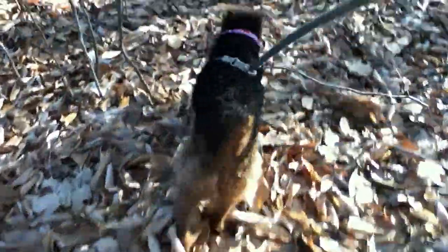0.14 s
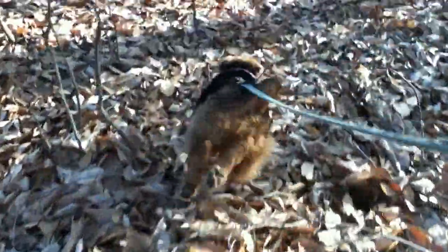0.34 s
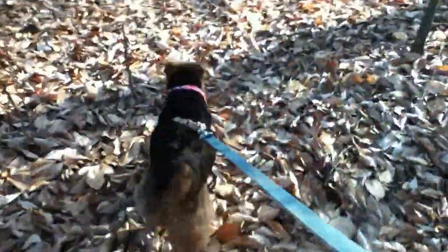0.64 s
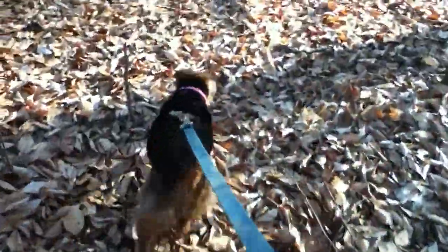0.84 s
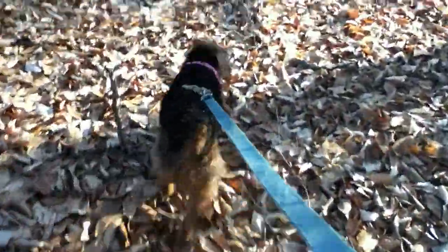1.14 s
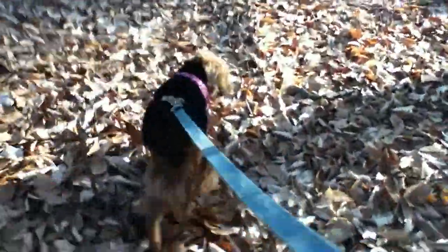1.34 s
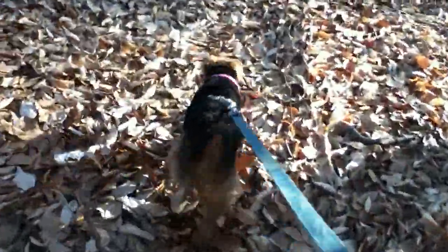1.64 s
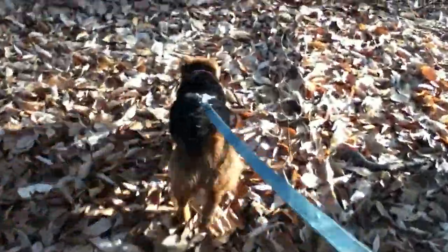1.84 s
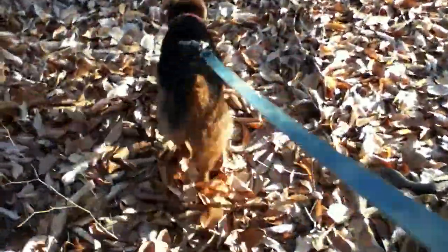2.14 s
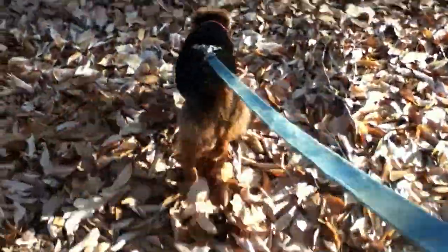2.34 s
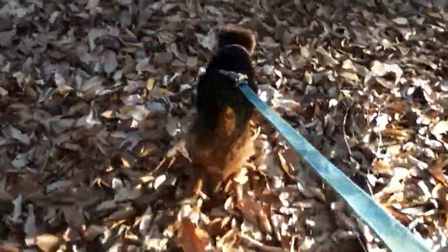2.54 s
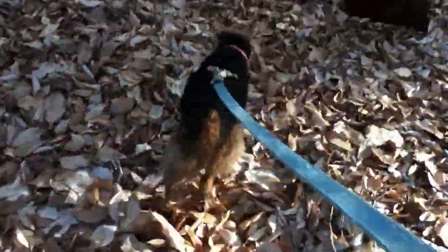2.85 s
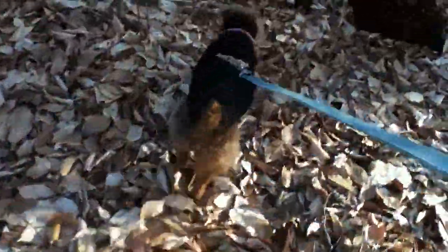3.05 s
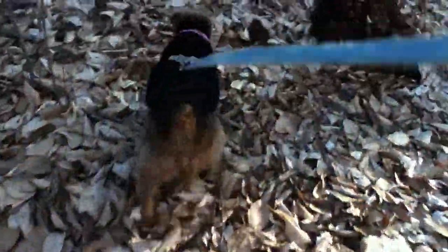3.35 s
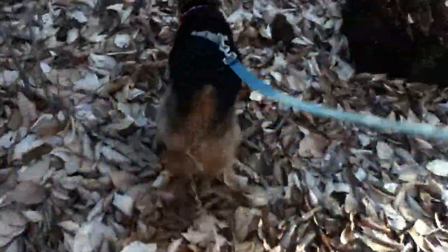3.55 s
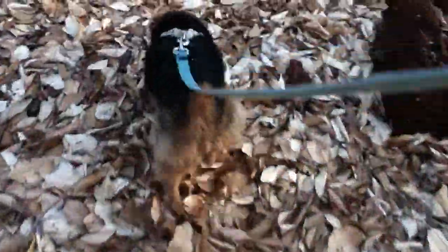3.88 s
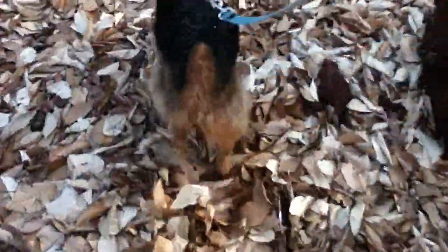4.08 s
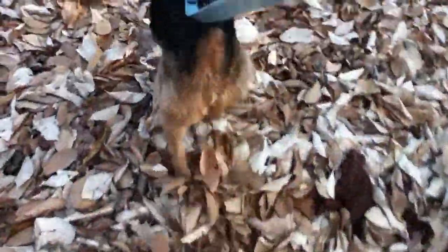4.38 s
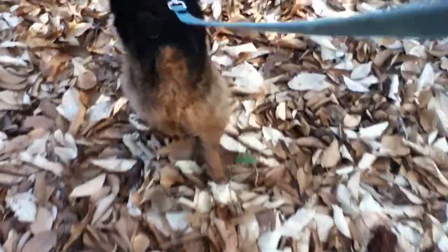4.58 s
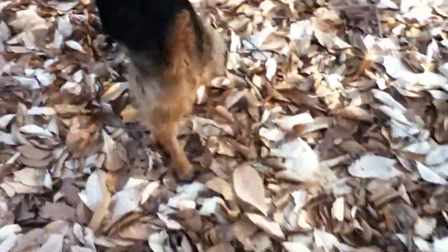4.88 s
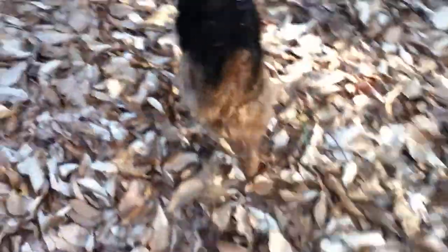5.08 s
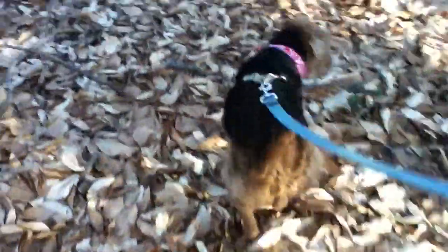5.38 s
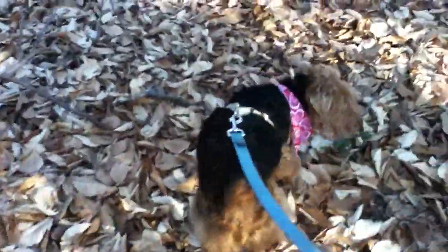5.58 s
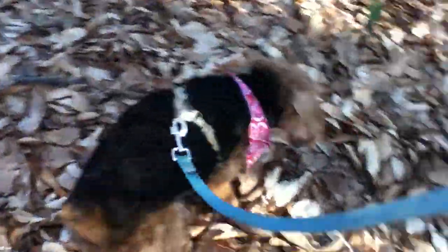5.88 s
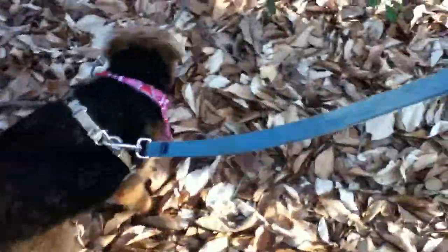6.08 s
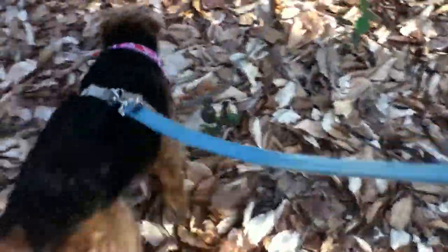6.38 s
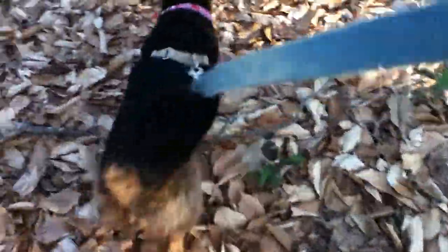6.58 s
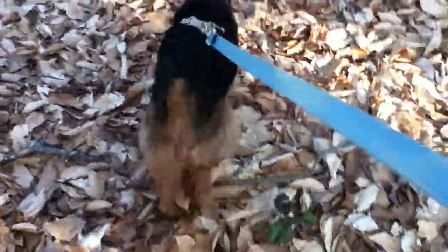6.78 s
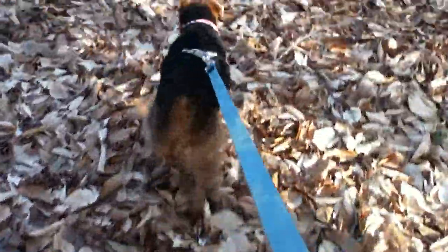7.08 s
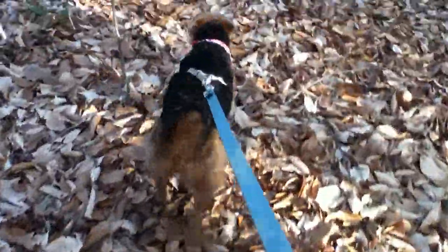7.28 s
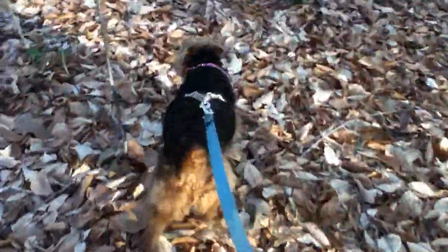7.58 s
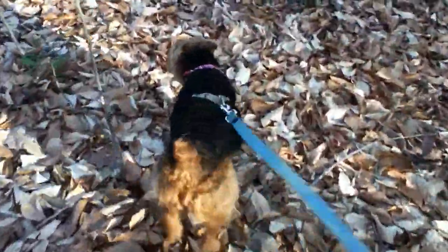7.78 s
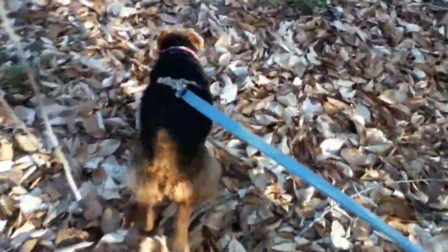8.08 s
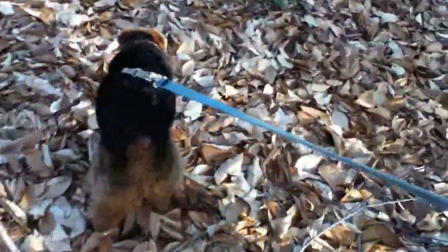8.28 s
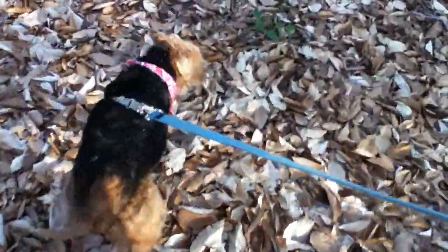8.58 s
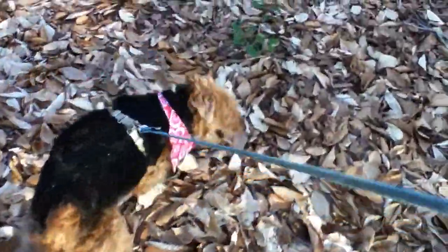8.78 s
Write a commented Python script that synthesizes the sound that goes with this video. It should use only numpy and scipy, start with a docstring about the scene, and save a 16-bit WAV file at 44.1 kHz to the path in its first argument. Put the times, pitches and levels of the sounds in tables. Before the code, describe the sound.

Close, bright crunching of dry leaves as a walker follows a small leashed dog through woods. Steps come about every half to one second, each swelling and easing, with lighter paw scuffs between. Twigs snap early on, then steps grow fuller in the middle and continue to the end. Quiet outdoor air and a very faint low hum lie behind. The microphone is carried close above the ground, dry and without echo.

```python
"""Outdoors, a walker follows a small dog on a lead over a thick bed of dry fallen leaves.
Every tread breaks many leaf ribs and blades: random impulses excite damped resonances in a dense crackle.
Noise adds the fine rustle; slower, lower resonances and dull noise give the pressed layers and soft litter.
Twigs snap, paws crush leaves and hollow sticks knock as decaying noise bursts with a pitch of their own.
Heels thud as damped sines, and a low wavering hum lies far off. Both channels carry the same sound."""
import sys
import numpy as np
from scipy import signal
from scipy.fft import rfft, irfft
from scipy.io import wavfile
from scipy.ndimage import uniform_filter1d

SR = 44100
rng = np.random.default_rng(int(sys.argv[2]) if len(sys.argv) > 2 else 0)


def transcribe(u):
    """Save the signal u as a 16-bit wav file named by the first command-line argument.

    u: samples, shape (n,) or (channels, n), limited to [-1, 1]; the rate is SR.
    q: integer samples, one column per channel.
    """
    v = np.clip(np.atleast_2d(u).T, -1, 1)
    q = np.round(v * 32767).astype(np.int16)
    wavfile.write(sys.argv[1], SR, q)


N = 393813

# Filter spectrum of brittle surface leaves. Each row: frequency in Hz, relative level in dB.
LEAF_SPECTRUM = [(400, -36), (900, -11.5), (1470, -9), (1950, 0.5), (2650, -0.5), (3250, 1), (3900, 0),
                 (5000, 0), (8500, -2.5), (11000, -6), (13000, -9.5), (15600, -19)]
# Filter spectrum of snapping and collapsing stalks. Each row: frequency in Hz, relative level in dB.
SNAP_SPECTRUM = [(60, -28), (250, -11.5), (1000, -8), (3500, -8), (8000, -8), (12000, -9.5), (15500, -18)]


def from_db(db):
    """The decibel is logarithmic: 20 dB is a tenfold amplitude."""
    return 10 ** (np.asarray(db) / 20)


def rms_one(x):
    """Normalise by the root of the mean power, to an rms of 1."""
    return x / np.sqrt(np.mean(x ** 2) + 1e-20)


def in_time(rows):
    """Linear interpolation of (seconds, value) rows at every sample."""
    seconds, value = np.transpose(rows)
    return np.interp(np.arange(N) / SR, seconds, value)


def add(track, start_s, sound):
    """Superposition: pressures sum where sounds overlap."""
    at = int(np.clip(round(start_s * SR), 0, N - 1))
    track[at:at + len(sound)] += sound[:N - at]


def coloured(x, points, size=4096):
    """Minimum-phase filtering: a folded cepstrum turns the magnitude spectrum into a causal response."""
    hz, db = np.transpose(points)
    grid = np.maximum(np.fft.rfftfreq(size, 1 / SR), 1)
    magnitude = from_db(np.interp(np.log(grid), np.log(hz), db))
    cepstrum = irfft(np.log(magnitude))
    # fold negative times onto positive ones
    cepstrum[1:size // 2] *= 2
    cepstrum[size // 2 + 1:] = 0
    response = irfft(np.exp(rfft(cepstrum)))
    return signal.oaconvolve(x, response)[:len(x)]


def resonance(x, hz, width_hz):
    """Damped oscillator: a two-pole resonance whose bandwidth sets its damping, with unit gain on top."""
    radius = np.exp(-np.pi * width_hz / SR)
    angle = 2 * np.pi * min(hz, SR / 2 - 1) / SR
    zeros = np.array([1, 0, -1]) * (1 - radius * radius) / 2
    poles = [1, -2 * radius * np.cos(angle), radius * radius]
    return signal.lfilter(zeros, poles, x)


def drift(per_s):
    """Slow random modulation: interpolated Gaussian values, per_s a second, with an rms of 1."""
    steps = np.arange(N) * min(per_s, SR / 2) / SR
    return rms_one(np.interp(steps, np.arange(N), rng.standard_normal(N)))


def dying(t60, size):
    """Exponential decay: energy loss takes the amplitude down 60 dB in t60 seconds."""
    return from_db(-60 * np.arange(size) / SR / max(t60, 1e-4))


def steadied(x, window_s):
    """Envelope normalisation: dividing by a moving rms evens the slow level and leaves the fast grain."""
    power = uniform_filter1d(x ** 2, max(int(window_s * SR), 2))
    return x / np.sqrt(np.abs(power) + 1e-9)


def starting_at(sound, level_db, size):
    """Onset scaling: the first size samples take the given rms level."""
    return from_db(level_db) * sound / np.sqrt(np.mean(sound[:size] ** 2))


def crack(hz, t60, sharpness, ring_db, shiver_db, shiver_t60, size=2048):
    """Impulsive fracture: a burst rings in its own blade, and the leaves that touch it shiver."""
    burst, shiver = rng.standard_normal((2, size))
    burst = burst * dying(t60, size)
    ring = resonance(burst, hz, hz / sharpness)
    shiver = shiver * dying(shiver_t60, size)
    return rms_one(rms_one(burst) + from_db(ring_db) * rms_one(ring) + from_db(shiver_db) * rms_one(shiver))


def fractures(per_s, spread_db, largest_db):
    """Random point process: breaks at chance moments, many tiny and a few large."""
    sizes = from_db(np.minimum(spread_db * rng.exponential(1, N), largest_db))
    happens = rng.random(N) < per_s / SR
    return happens * sizes * rng.choice([-1, 1], N)


def press(start_s, hold_s, rise_s, fall_s):
    """Loading envelope: one tread rises, holds and falls, in dB below its top."""
    fade_db = 20.5  # rise and fall times span this many dB
    t = np.arange(N) / SR
    before = np.maximum(start_s - t, 0) / max(rise_s, .005)
    after = np.maximum(t - start_s - hold_s, 0) / max(fade_floor(fall_s), .005)
    return -fade_db * np.minimum(before + after, 5)


def fade_floor(fall_s):
    """Unloading time: the shortest fall allowed is 5 ms."""
    return max(fall_s, .005)


def footwork():
    """Incoherent treads add in power; gives dB levels of crunch, treble lift, packed layers and litter."""
    # The walker's steps, rolling from heel to toe. Each row: heel landing in seconds, roll in seconds,
    # rise in seconds, fall in seconds, heel crunch in dB, toe crunch in dB, packed layers against the
    # crunch under the heel in dB, the same under the toe in dB, treble lift in dB,
    # soft litter against the packed layers in dB.
    steps = [(0.0, 0.17, .2, 0.2, -13.5, -22, -13, -6, 0.5, -5),
             (0.685, 0.03, .22, 0.25, -20, -21, -10, -10, 1, -9),
             (1.392, .08, 0.12, .26, -17, -17.5, -9, -10.5, 2, -6.5),
             (1.958, 0.22, 0.12, .19, -14, -15.5, -15.5, -11.5, 1.5, -6),
             (2.84, 0.058, 0.15, .08, -11, -14.5, -12, -9.5, 0.5, -9.5),
             (3.341, 0.14, 0.087, 0.27, -13.5, -13.5, -12.5, -10.5, 0.5, -5),
             (3.932, 0.15, 0.12, .24, -11.5, -12.5, -11, -10.5, 1.5, -14),
             (4.575, 0.21, .1, .36, -15.5, -13, -12.5, -11.5, 1.8, -9),
             (5.525, .025, .28, 0.16, -14.5, -14.5, -9.5, -9, 2.3, -11),
             (5.965, .03, 0.24, 0.21, -13, -13, -13, -10, 2.5, -23),
             (6.51, .155, 0.14, 0.47, -15, -15.5, -12, -15.5, 1.4, -11),
             (7.664, .03, 0.21, 0.18, -15, -14.8, -9.5, -8, 1.5, -10),
             (8.325, 0.14, .16, 0.35, -13.5, -19.5, -12, -8.5, 2, -19)]
    # Light treads, the dog's paws and scuffs through the top leaves. Each row: start in seconds,
    # length in seconds, crunch in dB, packed layers against the crunch in dB, treble lift in dB.
    pats = [(0.264, 0.0054, -26, -18, 1), (0.337, 0.085, -19.5, -11, -0.5), (0.593, 0.027, -30.5, -24, 8),
            (0.833, 0.13, -26, -15.5, 1.5), (1.094, 0.093, -23, -19, 2.5), (1.284, .03, -22, -28, 0.5),
            (1.581, 0.069, -25, -14, 1.5), (1.875, .04, -26.5, -4.5, 0), (2.319, 0.055, -16, -17.5, 2.5),
            (2.477, 0.082, -22, -12.5, 1), (2.632, 0.11, -19, -14.5, -.5), (2.939, .065, -18.5, -13.5, 1.5),
            (3.07, .035, -21.3, -11.5, 3), (3.235, .04, -22.5, -13.5, -1), (3.61, 0.021, -21.5, -17, 1),
            (3.78, 0.0099, -16, -13.5, 0), (4.23, .02, -21, -16, -0.5), (4.317, 0.018, -23.5, -15, 1),
            (4.41, .1, -25.5, -18, 2.5), (5.062, 0.081, -20.5, -16.5, 3), (5.301, .13, -21, -17, 0.5),
            (5.682, 0.021, -22, -10.5, -2), (5.783, 0.071, -20.5, -20, 2.5), (6.28, .03, -26, -10.5, 2),
            (6.385, 0.04, -23, -12, 3), (6.781, .04, -23.5, -11.5, -8), (7.065, 0.014, -19.5, -13, 1.5),
            (7.196, .04, -23.5, -10.5, 2), (7.289, .025, -21.5, -12.5, 1), (7.427, 0.028, -30.5, -16, -1),
            (7.893, 0.16, -30, -12, -2), (8.063, 0.047, -23.5, -11, 0), (8.586, .03, -23.5, -13, -4),
            (8.724, .05, -21.5, -15.5, 0), (8.88, .05, -21, -14, 2.5)]
    # Depth of the soft litter along the trail. Each row: time in seconds,
    # litter level against the packed layers under light treads in dB.
    depth = [(0.0, -3), (1.05, -14.5), (1.8, -11), (2.45, -2), (2.8, -8), (4.4, -1), (4.9, -11), (5.2, 3),
             (5.75, 1), (6.1, -14), (6.8, -3.5), (8.1, -7.5), (8.65, -2), (8.93, -10)]
    pat_rise_s, pat_fall_s = .08, .12
    stir_db, stir_packed_db = -33, -40.5  # leaves keep stirring between the treads
    midfoot_sag_db_per_s = 13.5  # the longer the roll, the more the crunch eases between heel and toe
    t = np.arange(N) / SR
    crunch = np.full(N, from_db(stir_db) ** 2)
    treble = crunch.copy()
    packed = np.full(N, from_db(stir_packed_db) ** 2)
    for start_s, length_s, level_db, weight_db, lift_db in pats:
        power = from_db(level_db + press(start_s, length_s, pat_rise_s, pat_fall_s)) ** 2
        crunch += power
        treble += power * from_db(lift_db) ** 2
        packed += power * from_db(weight_db) ** 2
    litter = packed * from_db(in_time(depth)) ** 2
    for (start_s, roll_s, rise_s, fall_s, heel_db, toe_db,
         heel_weight_db, toe_weight_db, lift_db, sink_db) in steps:
        midfoot_db = (heel_db + toe_db) / 2 - midfoot_sag_db_per_s * roll_s
        roll_times = [start_s, start_s + roll_s / 2, start_s + roll_s]
        rolling_db = np.interp(t, roll_times, [heel_db, midfoot_db, toe_db])
        power = from_db(rolling_db + press(start_s, roll_s, rise_s, fall_s)) ** 2
        weight_db = np.interp(t, [start_s, start_s + roll_s], [heel_weight_db, toe_weight_db])
        weight = power * from_db(weight_db) ** 2
        crunch += power
        treble += power * from_db(lift_db) ** 2
        packed += weight
        litter += weight * from_db(sink_db) ** 2
    return 10 * np.log10([crunch, treble / crunch, packed, litter])


def leaf_bed(breaks, leaves, hold_s, count):
    """Convolution of breaks with leaf responses: count leaves at a time crack repeatedly for hold_s."""
    slot = rng.integers(0, count, N)
    turn = (np.arange(N) / SR / max(hold_s, .001) + slot / count).astype(int)
    dealt = rng.integers(0, len(leaves), N)[turn * count + slot]
    out = sum(signal.oaconvolve(breaks * (dealt == k), leaf)[:N] for k, leaf in enumerate(leaves))
    # the inverse of the leaves' mean power spectrum makes the whole bed evenly coloured
    power = np.mean(np.abs(rfft(leaves)) ** 2, axis=0)
    grid = np.fft.rfftfreq(len(leaves[0]), 1 / SR)
    inverse = np.column_stack([grid, -10 * np.log10(power)])[1:]
    return rms_one(coloured(out, inverse))


def top_leaves(breaks, tread_db, lift_db, count=48):
    """Brittle fracture and friction: surface leaves crackle over the rustle of sliding blades."""
    leaves = [crack(hz, t60=0.0039, sharpness=3.4, ring_db=-6.5, shiver_db=4.5, shiver_t60=0.1)
              for hz in np.geomspace(1500, 11000, count)]
    crackle = leaf_bed(breaks, leaves, hold_s=.025, count=3)
    rustle = from_db(-6) * rng.standard_normal(N)
    sound = steadied(coloured(crackle + rustle, LEAF_SPECTRUM), window_s=0.05)
    high_pass = signal.butter(1, 6500, "high", fs=SR, output="sos")
    treble = signal.sosfilt(high_pass, sound)
    lift = from_db(lift_db)
    # the treble rises by the lift and the rest drops by as much
    tilted = (sound - treble) / lift + treble * lift
    return tilted * from_db(tread_db - 3.5)


def packed_leaves(breaks, packed_db, litter_db, count=24):
    """Damping under load: the same breaks sound duller and longer below, dullest in the soft litter."""
    # Filter spectrum of the pressed layers. Each row: frequency in Hz, relative level in dB.
    packed_spectrum = [(120, -23.5), (300, -12), (430, -3.5), (560, -4), (800, -1.5), (1250, -2),
                       (1800, -1.5), (3000, -27)]
    # Filter spectrum of the soft litter. Each row: frequency in Hz, relative level in dB.
    litter_spectrum = [(25, -35), (60, -19.5), (130, -8), (250, -4), (380, -1), (600, -12), (1200, -18.5)]
    leaves = [crack(hz, t60=0.0095, sharpness=3.1, ring_db=-6.0, shiver_db=-2, shiver_t60=0.034)
              for hz in np.geomspace(300, 1700, count)]
    crunch = leaf_bed(breaks, leaves, hold_s=.02, count=4)
    crunch = crunch + from_db(-6) * rng.standard_normal(N)
    packed = steadied(rms_one(coloured(crunch, packed_spectrum)), window_s=0.26)
    litter = steadied(rms_one(coloured(crunch, litter_spectrum)), window_s=0.064)
    return from_db(packed_db - 4.5) * packed + from_db(litter_db - 7.0) * litter


def settling(tread_db, count=16):
    """Elastic recovery: bent leaves spring back one by one in lone bright ticks."""
    ticks = fractures(per_s=42, spread_db=5.0, largest_db=9)
    dealt = rng.integers(0, count, N)
    out = np.zeros(N)
    for k, hz in enumerate(np.geomspace(3500, 12000, count)):
        tick = crack(hz, t60=.0018, sharpness=3.0, ring_db=0, shiver_db=-9, shiver_t60=.02)
        tick = starting_at(coloured(tick, LEAF_SPECTRUM), 0, size=88)
        out += signal.oaconvolve(ticks * (dealt == k), tick)[:N]
    return out * from_db(.7 * tread_db - 16)


def distance():
    """Frequency and amplitude modulation make a far-off hum waver over low-pitched air noise."""
    # Distant hum. Each row: time in seconds, level in dB before the 2 dB cut and the random wavering.
    hum_level = [(0, -73), (3.4, -58), (4.7, -56), (5.2, -64), (6.25, -54), (6.8, -58), (7.9, -57),
                 (7.99, -49), (8.35, -48), (8.48, -57), (8.93, -65)]
    # Filter spectrum of the outdoor air. Each row: frequency in Hz, relative level in dB.
    air_spectrum = [(20, -35), (60, -2), (100, -3.5), (250, -2), (1000, -7.5), (8000, -43)]
    hum_hz, air_db = 97, -51.5  # centre of the wavering pitch; rms level of the air
    phase = 2 * np.pi * np.cumsum(hum_hz + 2.3 * drift(12)) / SR
    hum = np.sin(phase) * from_db(in_time(hum_level) - 2.0 + 2.9 * drift(14))
    air = rms_one(coloured(rng.standard_normal(N), air_spectrum))
    return hum + from_db(air_db) * air


def collapses(rows, sharpness, ring_db, grain_db, size=8192):
    """Cavity resonance: a dying rush of small breaks rings at the pitch of the hollow that caves in."""
    out = np.zeros(N)
    for start_s, level_db, t60, hz in rows:
        grain_sizes = from_db(grain_db * rng.standard_normal(size))
        grains = rng.standard_normal(size) * grain_sizes * dying(t60, size)
        ring = rms_one(resonance(grains, hz, hz / sharpness))
        sound = coloured(rms_one(grains) + from_db(ring_db) * ring, SNAP_SPECTRUM)
        add(out, start_s, starting_at(sound, level_db - 0.5, size=256))
    return out


def hollow_knocks():
    """Strong resonance: sticks and husks under the leaves knock with a clear pitch."""
    # Each row: start in seconds, starting level in dB before a 0.5 dB cut, t60 in seconds, pitch in Hz.
    knocks = [(0.149, -22.5, 0.089, 1400), (0.522, -21, 0.026, 1300), (0.5368, -20, 0.0076, 900),
              (1.09, -34, 0.1, 600), (1.832, -33, .04, 1500), (1.9125, -24.5, .04, 676),
              (3.447, -24, 0.036, 350), (4.725, -30, 0.14, 1030), (4.799, -36, 0.086, 1150),
              (4.845, -26.5, 0.2, 820), (4.877, -23, 0.063, 830), (5.063, -29, .06, 930),
              (5.699, -33, 0.042, 900), (6.374, -33, .06, 775), (6.525, -24.5, 0.051, 1110),
              (7.188, -28, 0.072, 774), (7.964, -30, 0.055, 795), (8.139, -32, 0.03, 1000),
              (8.622, -27, .05, 520)]
    return collapses(knocks, sharpness=1.65, ring_db=9, grain_db=-1.0)


def crushed_leaves():
    """Weak resonance: single curled leaves collapse under a paw with more rush than ring."""
    # Each row: start in seconds, starting level in dB before a 0.5 dB cut, t60 in seconds, centre in Hz.
    crushes = [(0.348, -22.5, 0.26, 8000), (0.4925, -21.5, 0.31, 3500), (0.692, -20.5, 0.12, 2500),
               (1.957, -20, 0.086, 2400), (2.835, -28, .08, 5000), (3.2005, -24, .06, 2000),
               (3.2085, -17.5, 0.072, 6000), (3.221, -20, 0.059, 7500), (3.361, -14.5, 0.11, 4940),
               (3.7255, -19, 0.062, 7000), (3.766, -23, .10, 3500), (4.151, -17, 0.069, 8500),
               (4.240, -17.5, 0.16, 3380), (4.533, -21, 0.12, 4000), (5.525, -15, 0.091, 4500),
               (5.762, -22.5, 0.061, 5000), (5.970, -12.5, 0.14, 6000), (6.374, -23, 0.076, 4000),
               (6.798, -20.5, 0.12, 5970), (6.982, -17, 0.17, 4200), (7.553, -27, 0.18, 6000),
               (8.606, -21.5, 0.05, 5000)]
    return collapses(crushes, sharpness=1.6, ring_db=-3.0, grain_db=0.0)


def twigs():
    """Sudden release of strain: a stalk breaks with a sharp crack and a short woody ring."""
    # Each row: start in seconds, level of the first 2 ms in dB,
    # nominal t60 in seconds (halved for the burst, doubled for the shiver), centre in Hz.
    snaps = [(0.506, -15, .014, 8400), (0.5217, -10, .014, 2400), (0.5366, -11, .012, 3400),
             (0.6023, -20, .012, 9500), (0.7112, -19, .012, 3400), (1.8344, -25, .012, 2000),
             (2.778, -16, .012, 9000), (2.9035, -17, .012, 4800), (3.003, -18, .014, 5800),
             (3.136, -18, .014, 5000), (3.170, -20, .014, 5400), (3.6713, -15, .012, 7000),
             (4.0868, -10, .008, 3000), (4.7313, -14, .012, 7100), (5.0635, -22.5, .014, 7500),
             (5.229, -25, .012, 5900), (5.6765, -21, .012, 7400), (6.3379, -18, .014, 3700),
             (6.9807, -12.5, .018, 4200), (7.0397, -23, .005, 5200), (7.2758, -22, .012, 2000),
             (7.522, -25, .012, 6500), (7.622, -19, .012, 6500), (7.7815, -21, .012, 6000),
             (8.0468, -24, .012, 6000), (8.095, -22, .012, 7400), (8.146, -23, .012, 6000),
             (8.2355, -18, .022, 3400), (8.5854, -21, .014, 7300)]
    out = np.zeros(N)
    for start_s, level_db, t60, hz in snaps:
        sound = crack(hz, t60 / 2, sharpness=1.4, ring_db=1.5, shiver_db=-4, shiver_t60=t60 * 2)
        add(out, start_s, starting_at(coloured(sound, SNAP_SPECTRUM), level_db, size=88))
    return out


def soil(size=8192):
    """Damped oscillation: soft ground gives a few cycles under a heel or a tug."""
    # Each row: start in seconds, nominal level in dB before a 4 dB cut and the swell, pitch in Hz.
    thuds = [(0.536, -39, 178), (2.859, -26, 151), (3.469, -39, 215), (6.589, -38, 78.1)]
    out = np.zeros(N)
    t = np.arange(size) / SR
    swell = dying(0.13, size) * (1 - dying(0.022, size))
    for start_s, level_db, hz in thuds:
        add(out, start_s, from_db(level_db - 4.0) * swell * np.sin(2 * np.pi * hz * t))
    return out


def scene():
    """Fracture rate follows load: harder treading breaks more leaves a second, in clumps."""
    tread_db, lift_db, packed_db, litter_db = footwork()
    clumps_db = 3.6 * drift(160)
    per_s = 1900 * from_db(.7 * (tread_db - tread_db.mean()) + clumps_db)
    breaks = fractures(per_s, spread_db=3.0, largest_db=8)
    leaves = top_leaves(breaks, tread_db, lift_db)
    leaves = leaves + packed_leaves(breaks, packed_db, litter_db) + settling(tread_db)
    mix = leaves + distance() + hollow_knocks() + crushed_leaves() + twigs() + soil()
    return np.tile(mix, (2, 1))


def record(dry):
    """Saturation and band limiting: the tallest peaks are rounded off and the top is cut."""
    rounded = dry / (1 + np.abs(dry / .85) ** 4) ** (1 / 4)
    cutoff_hz = 15750
    low_pass = signal.ellip(10, .1, 80, cutoff_hz, fs=SR, output="sos")
    return signal.sosfilt(low_pass, rounded)


dry = scene()
out = record(dry)
transcribe(out)
```